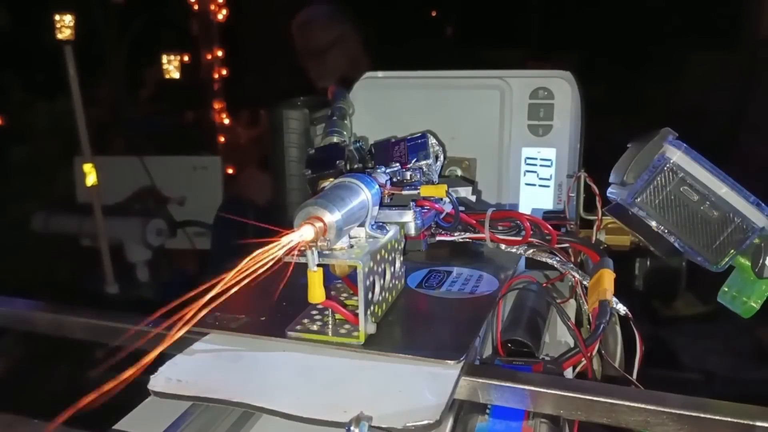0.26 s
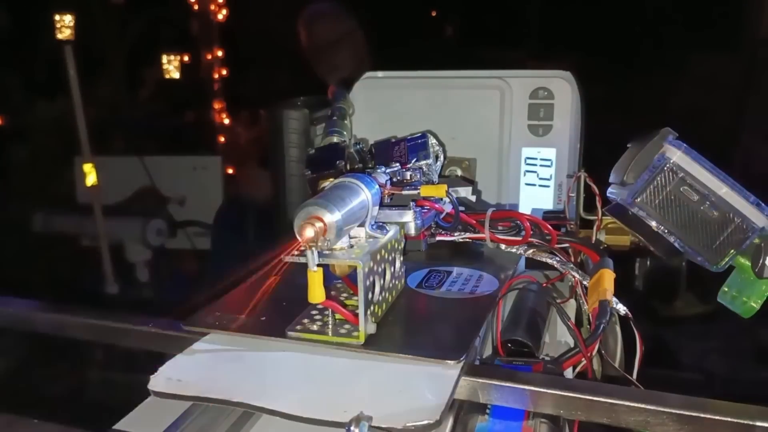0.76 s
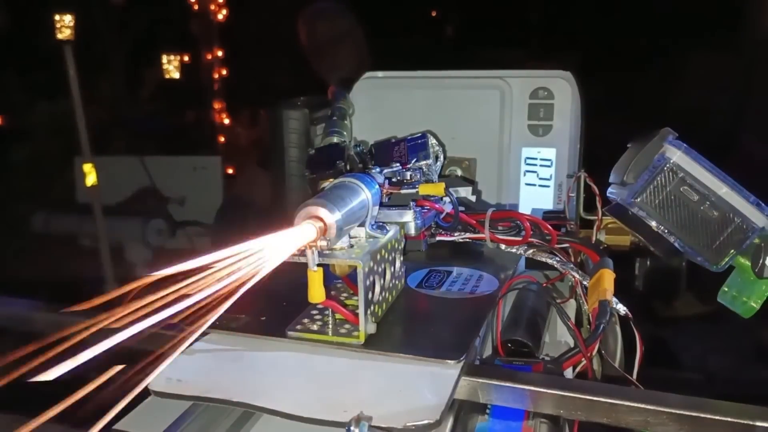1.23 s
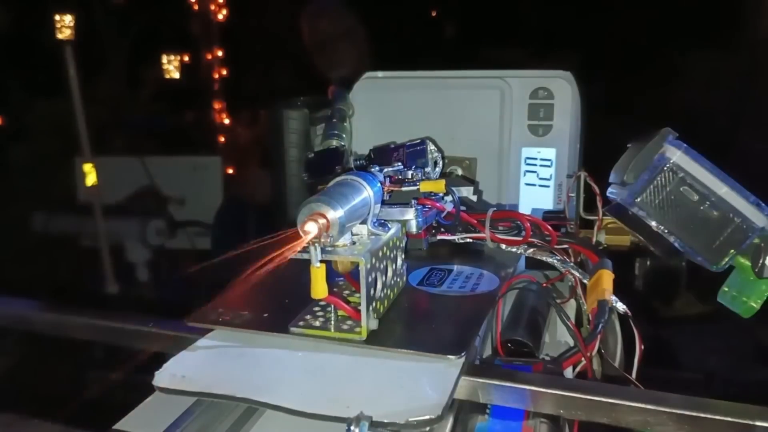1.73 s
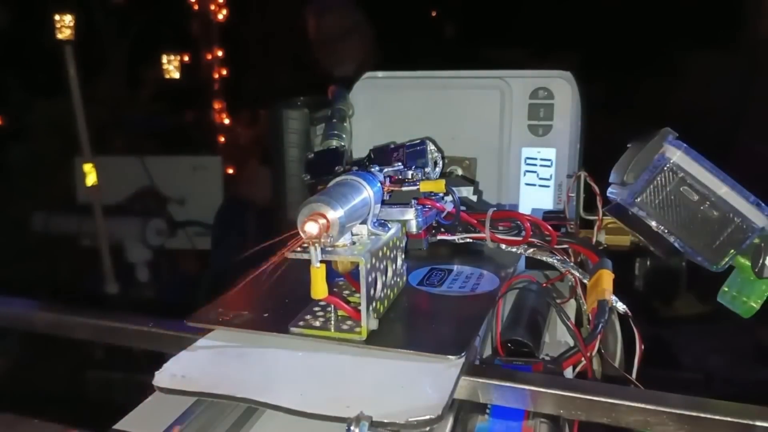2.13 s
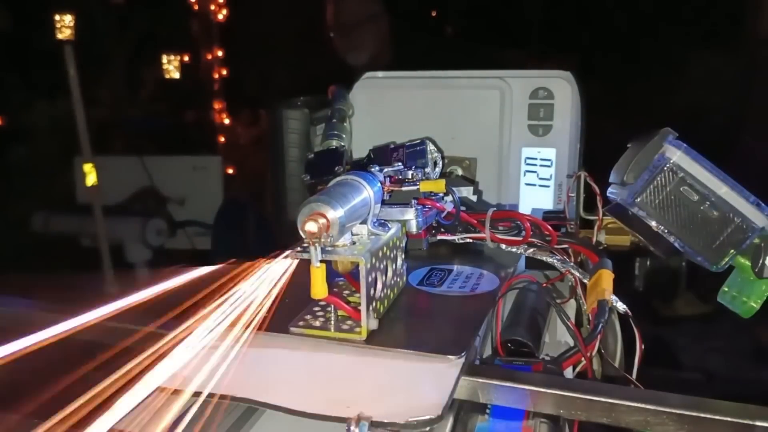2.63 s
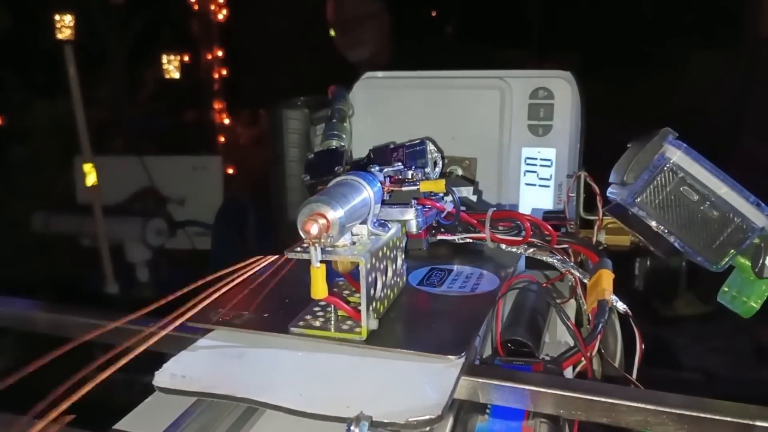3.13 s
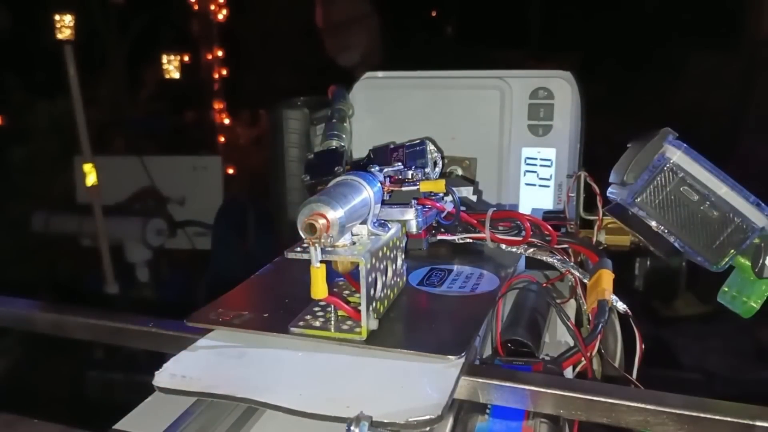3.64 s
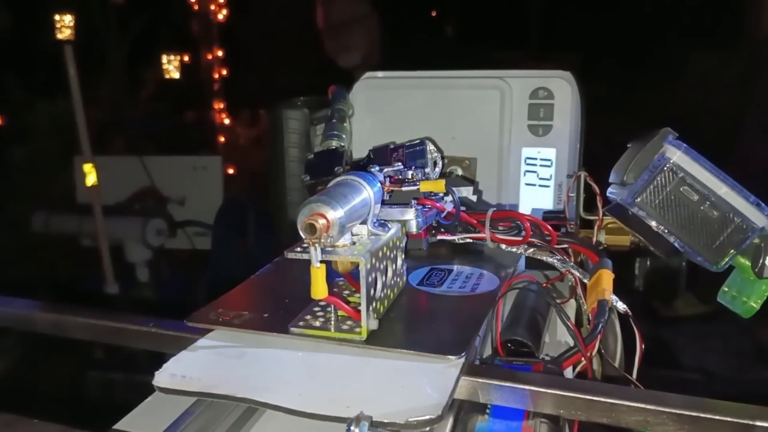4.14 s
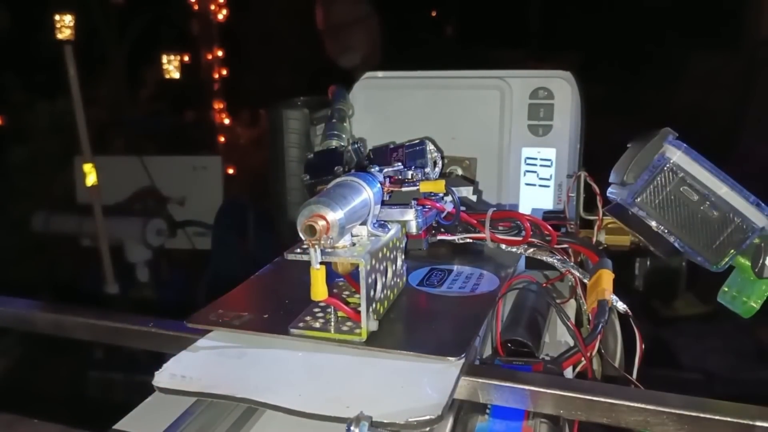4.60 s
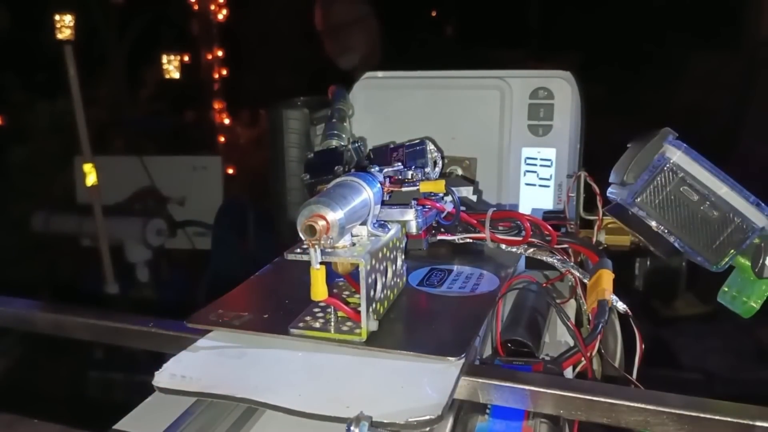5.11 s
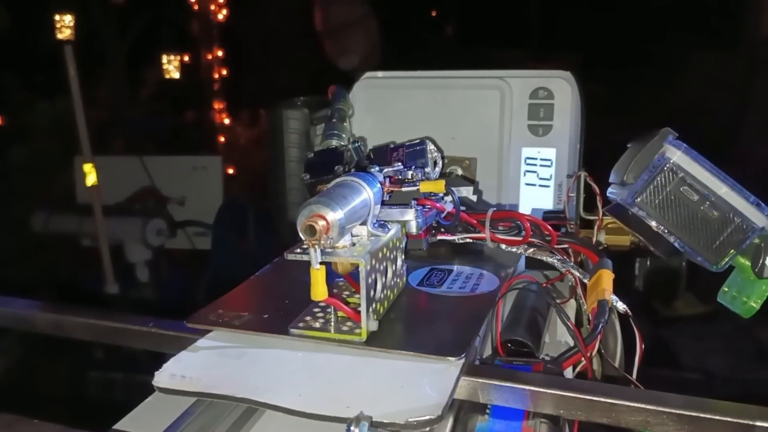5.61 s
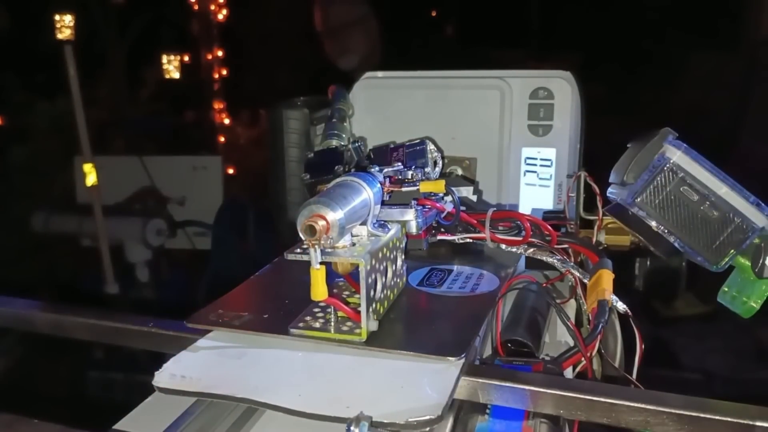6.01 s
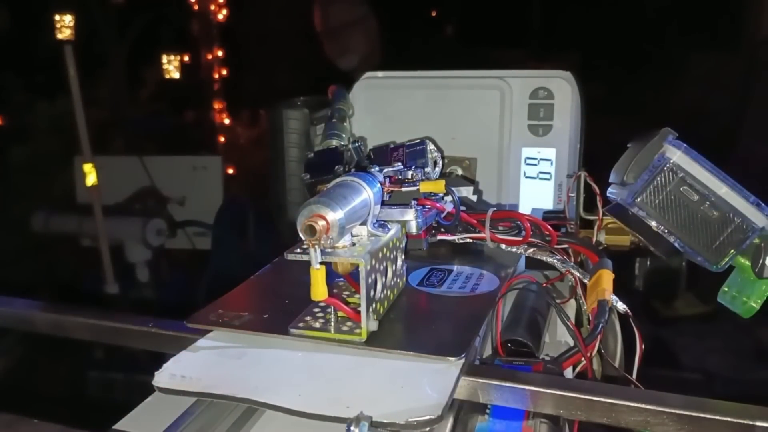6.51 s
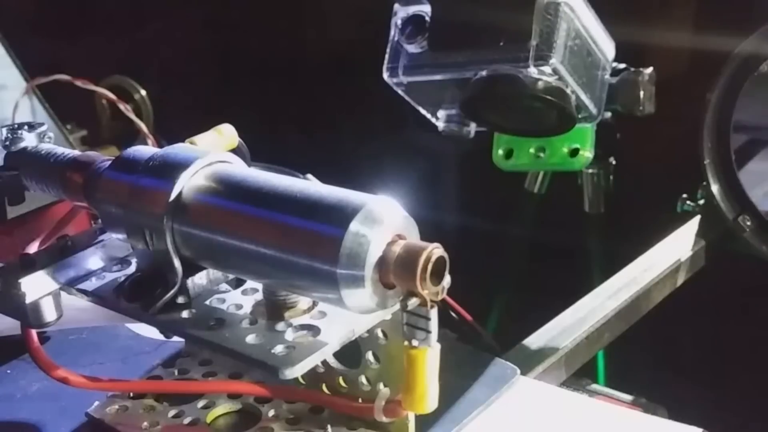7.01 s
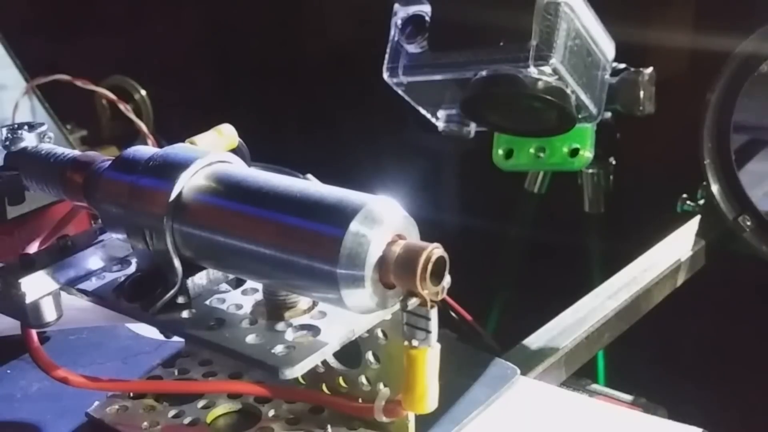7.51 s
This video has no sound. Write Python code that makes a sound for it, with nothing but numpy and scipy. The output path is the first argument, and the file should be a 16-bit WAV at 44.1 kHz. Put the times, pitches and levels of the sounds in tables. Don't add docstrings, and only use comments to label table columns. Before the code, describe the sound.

Stereo microphone near an arc-heated air jet outdoors: thin whistling sputter first, then sudden violent rushing air with low wind thumps, strongest early and rough around the edges. The blast steadies and stops abruptly. A soft throbbing bleed of air dies down above a piston compressor's low chug. An abrupt cut brings harsh, ringing, nearly overloaded nozzle hiss right up close, in mono.

```python
import sys
import numpy as np
from scipy import signal
from scipy.fft import rfft, irfft
from scipy.io import wavfile
from scipy.ndimage import uniform_filter1d, map_coordinates

SR = 44100
rng = np.random.default_rng(int(sys.argv[2]) if len(sys.argv) > 2 else 0)


def persist_wave(psi):
    counts = np.round(np.clip(psi, -1, 1) * 32767).astype(np.int16)
    wavfile.write(sys.argv[1], SR, np.atleast_2d(counts).T)


def gain_from_decibels(decibels):
    exponent = np.asarray(decibels, float) / 20
    return 10 ** exponent


N = 341775
T = np.arange(N) / SR
HZ = np.maximum(np.arange(N // 2 + 1) * SR / N, 1)
SIMMER_ENDS_S, WIDE_ENDS_S = 0.79, 6.4712


def shape(table):
    return np.interp(np.log(HZ), np.log(np.array(table)[:, 0]), np.array(table)[:, 1])


def joined(low, high, hz):
    low_db, high_db, at = shape(low), shape(high), int(hz * N / SR)
    return gain_from_decibels(np.where(HZ < hz, low_db, high_db + low_db[at] - high_db[at]))


def ring(hz, width_hz):
    return 1 / (1 + 1j * (HZ / hz - hz / HZ) * hz / width_hz)


def walk(rate_hz):
    hold = int(SR / rate_hz)
    steps = np.repeat(rng.standard_normal(N // hold + 1), hold)
    return 1.305 * uniform_filter1d(uniform_filter1d(steps, hold), hold)[:N]


def swells(table):
    return sum(db * np.exp(-((T - s) / half_s) ** 2) for s, half_s, db in table)


def valve(start_s, full_s, cut_s, db_per_s):
    opening = np.clip((T - start_s) / (full_s - start_s), 0, 1) ** 1.2
    return opening * gain_from_decibels(-db_per_s * np.maximum(T - cut_s, 0))


def sag(start_s, db, tau_s):
    return db * np.exp(-np.maximum(T - start_s, 0) / tau_s)


def band_rms(spectrum, lo_hz, hi_hz):
    mid = spectrum.mean(axis=0)[(HZ > lo_hz) & (HZ < hi_hz)]
    return np.sqrt(2 * np.sum(abs(mid) ** 2)) / N


def port_noise(shadow, bass_alike_hz=1):
    # frequency in Hz, left minus right in dB.
    housing = [(40, 4.87), (150, 1), (1000, 0.3), (3800, 2.8), (4700, 1.9), (5300, 10), (6100, 13.97),
               (6350, 5), (7200, 0.1), (8500, -2), (10500, 0.03), (12300, 3.97), (14000, 0), (16000, 0.2)]
    # frequency in Hz, likeness of the ports (0-1).
    likeness = [(40, 0), (2000, 0.067), (3500, 0.0023), (5200, 0.28), (6300, 0.3), (8000, 0.041),
                (16000, 0.002)]
    lag_samples = 8
    shared, left, right = rfft(rng.standard_normal((3, N)))
    alike = np.clip(shape(likeness) + 1 / (1 + (HZ / bass_alike_hz) ** 2), 0, 1)
    late = np.exp(-2j * np.pi * HZ * lag_samples / SR)
    pair = np.sqrt(alike) * shared * np.array([late ** 0, late])
    pair = pair + np.sqrt(1 - alike) * np.array([left, right])
    tilt = gain_from_decibels(shadow * shape(housing))
    return pair * np.array([tilt, tilt ** 0]) / np.sqrt(1 + tilt ** 2)


def patchy(x):
    patch_db, patch_octaves, patch_s = 1.8, .3, .03
    hz, s, z = signal.stft(x, SR, nperseg=1024)
    rows = np.log2(np.maximum(hz, 40) / 40) / patch_octaves
    columns = s / patch_s
    field = rng.standard_normal((int(rows[-1]) + 2, int(columns[-1]) + 2))
    db = patch_db * map_coordinates(field, np.meshgrid(rows, columns, indexing="ij"), order=1)
    return signal.istft(z * gain_from_decibels(db * (hz[:, None] < 5000)), SR)[1][:, :N]


def camera_gain():
    ducked_db, settled_db, overshoot_db, settle_s = -10.5, -4, 8, 0.91
    recovers_s = (4.25, 4.6)
    free_db = settled_db + sag(recovers_s[1], overshoot_db, settle_s)
    return gain_from_decibels(ducked_db + (free_db - ducked_db) * np.interp(T, recovers_s, [0, 1]))


def yard():
    # frequency in Hz, level in dB per Hz.
    yard_air = [(24, -20), (60, -2), (110, 0), (200, -4), (340, -3), (480, 4), (620, 2), (800, -4),
                (1000, -3), (1500, -12), (2500, -30)]
    air = port_noise(.2, 430) * gain_from_decibels(shape(yard_air))
    return irfft(air, N) / band_rms(air, 20, 3000) * gain_from_decibels(-56 + walk(6))


def compressor(shaft_hz, orders, gain_db):
    phase = 2 * np.pi * np.cumsum(shaft_hz * (1 + .0005 * walk(1.5))) / SR
    order = np.transpose(orders)[0]
    start = np.where(order < 13, -1.35 * order ** 2, 2 * np.pi * rng.random(len(orders)))
    lines = sum(np.sqrt(2) * gain_from_decibels(db) * np.sin(k * phase + p) for (k, db), p in zip(orders, start))
    return lines * gain_from_decibels(gain_db + .5 * walk(6.6)), phase


def draught():
    air = port_noise(1.5) * ring(105, 160) ** 2
    return irfft(air, N) / band_rms(air, 20, 3000) * gain_from_decibels(-65 + 2 * walk(6.6)) * (T < SIMMER_ENDS_S)


def knocks():
    # time in seconds, left peak, right peak (full scale 1), pitch in Hz.
    puffs = [(.9655, .13, .03, 110), (.99, .08, 0, 100), (1.009, .3, -.15, 230), (1.106, .07, 0, 110),
             (1.116, .09, 0, 120), (1.144, .08, 0, 100), (1.172, .07, 0, 110), (1.272, .1, 0, 120),
             (1.4175, -.3, 0, 300), (1.4325, .35, 0, 220), (1.4455, .5, .1, 350), (4.4292, .13, 0, 130),
             (4.4432, .16, 0, 115), (4.461, .03, 0, 90)]
    # time in seconds, level in dB, T60 in seconds.
    ticks = [
        (5.733, -35, .04),
        (5.76, -46, .015),
        (5.767, -47, .015),
    ]
    out = np.zeros((2, N))
    for s, left, right, hz in puffs:
        turn = 4 * hz * (T - s)
        out -= turn * np.exp((1 - turn ** 2) / 2) * np.array([[left], [right]])
    out = irfft(rfft(out) / (1 + (65 / HZ) ** 4), N)
    crack = irfft(port_noise(.4, 9000) * ring(6100, 5500) ** 2, N)
    for s, level_db, t60_s in ticks:
        out += crack / crack.std() * (T > s) * gain_from_decibels(level_db - 60 * np.maximum(T - s, 0) / t60_s)
    return out


def bleed(shaft_phase):
    # frequency in Hz, level in dB per Hz.
    bleed_air = [(620, -10), (1050, -5.5), (1350, -11), (1460, -8), (1790, -5), (2630, -5.5), (2850, -6),
                 (3160, -3.5), (4650, -5.5), (6600, 1), (8500, -13.5), (11000, -46), (18700, -120)]
    bleed_top = [(4410, -30), (7500, 2), (8200, -5), (9840, -8), (10500, -9.5), (12400, -13), (13900, -12),
                 (14800, -9), (15700, 1)]
    # time in seconds, half length in seconds, swell in dB.
    hiccup = [
        (4.672, .012, -3),
    ]
    starts_s, settled_db, hiss_db = 4.46, -56, -51.5
    air = port_noise(0.87, 630) * joined(bleed_air, bleed_top, 8000)
    low = 1 / (1 + (HZ / 9500) ** 8)
    leak_db = settled_db + sag(starts_s, 12, 1.08) + sag(starts_s, -1, 0.084) + swells(hiccup)
    throb_db = 1.0 * np.cos(2 * shaft_phase + .3) + 0.67 * np.cos(shaft_phase + 1.2)
    leak = irfft(air * low, N) * gain_from_decibels(leak_db + throb_db + .5 * walk(14))
    hiss = irfft(air * (1 - low), N) * gain_from_decibels(hiss_db + throb_db / 2)
    return (leak + hiss) / band_rms(air, 1900, 6700) * (T > starts_s)


def simmer():
    # frequency in Hz, level in dB per Hz.
    simmer_air = [(180, -75), (300, -56), (623, -34), (709, -30.5), (878, -34), (1070, -28.5), (1490, -31),
                  (1800, -31.5), (2840, -26), (3100, -29.5), (3900, -19.5), (4630, -27), (4970, -15.5),
                  (6250, -1.5), (9200, -28.5), (12000, -53), (20200, -120)]
    simmer_top = [(4940, -30), (8400, -4), (9010, -8), (9670, -13.5), (10800, -16.5), (12000, -15.5),
                  (13200, -5), (14400, -13), (15100, 2), (15700, -2.5)]
    # time in seconds, half length in seconds, swell in dB.
    spits = [
        (.1, .012, 3.5),
        (.16, .02, 0.5),
        (.27, 0.0089, 2.5),
        (.41, 0.026, 1.5),
        (.65, .025, 3.5),
        (.71, 0.025, 1.5),
    ]
    air = port_noise(1.9, 500) * joined(simmer_air, simmer_top, 8000)
    low = 1 / (1 + (HZ / 8800) ** 12)
    whistle = irfft(air * low, N) / band_rms(air, 4400, 6300)
    whistle = whistle * gain_from_decibels(-31.5 + swells(spits) + .7 * walk(90))
    top = irfft(air * (1 - low), N) / band_rms(air, 8850, 14850)
    top = top * gain_from_decibels(-44.5 + 1.9 * walk(40) + 0.82 * walk(10))
    return (whistle + top) * gain_from_decibels(-300 * np.maximum(T - SIMMER_ENDS_S, 0))


def close_jet():
    # frequency in Hz, level in dB per Hz.
    near_air = [(24, -62), (40, -33), (189, -23), (331, -26), (664, -15.5), (889, -19.5), (1060, -15),
                (1630, -23), (2990, -17.5), (3500, -17), (3830, -11), (4690, -11), (6280, 0), (7690, -3.5),
                (8600, -23), (11200, -53), (18900, -120)]
    near_top = [(4710, -31), (8000, -4.5), (8390, -14.5), (10000, -20), (10400, -13.5), (10800, -10),
                (11200, -6.5), (11700, -1.5), (12200, -1), (13400, -14), (14600, -15), (14900, -20),
                (15700, -21)]
    # frequency in Hz, width in Hz, level in dB per Hz.
    nozzle = [(966, 54, -21), (1062, 73, -17.5), (3835, 150, -10), (5210, 320, -8), (5770, 260, -9),
              (6230, 370, -2.5), (7050, 310, -5.5), (7644, 280, -4.5), (11060, 200, -20), (11700, 200, -20),
              (14300, 250, -21)]
    # frequency in Hz, width in Hz, depth (0-1).
    bench_dips = [(6700, 120, 0.4), (8200, 340, .4), (10200, 300, .6), (14600, 400, .6)]
    hiss = rfft(rng.standard_normal(N)) * joined(near_air, near_top, 8300)
    out = irfft(hiss * gain_from_decibels(-6) / (1 + .8 * abs(ring(220, 200)) ** 2), N)
    for hz, width_hz, db in nozzle:
        tone = rfft(rng.standard_normal(N)) * ring(hz, width_hz) ** 2 * gain_from_decibels(db)
        out += irfft(tone, N) * gain_from_decibels(walk(25))
    dips = np.prod([1 - depth * ring(hz, width_hz) for hz, width_hz, depth in bench_dips], axis=0)
    out = irfft(rfft(out) * dips, N)
    return out / out.std() * gain_from_decibels(-8.5 + .5 * walk(9.5))


def throat_song():
    # start, full and cut in seconds, dying in dB per second, level in dB.
    throat = [
        (0.728, 0.83, 1.065, 300, -25),
        (4.426, 4.444, 4.47, 700, -37.5),
    ]
    song = port_noise(0.91) * ring(3845, 490) ** 2
    gain = sum(valve(*row) * gain_from_decibels(db) for *row, db in throat)
    return irfft(song, N) / band_rms(song, 3400, 3960) * gain


def blast():
    # frequency in Hz, level in dB per Hz.
    blast_air = [(18, -54), (30, -27), (49, -24), (102, 0), (149, 1.5), (262, 2), (622, 0.5), (721, 0),
                 (4600, -2.5), (5980, -34), (10100, -120)]
    blast_top = [(2350, -38), (4000, -3.5), (4690, -7.5), (5570, 0.5), (6660, 1), (7990, -9), (9760, -9.5),
                 (11100, -15.5), (13600, -15.5), (14900, -10), (15700, -0.5)]
    edges_hz = [1220, 4360, 6300]
    # time in seconds, arc heat in dB, plume washing over the camera in dB.
    jet = [
        (.86, 10, 0),
        (1.2, 10.5, 5),
        (1.42, 8, 8.5),
        (1.66, 6.5, 10.5),
        (1.8, 0, 9.5),
        (2.02, -1.5, 4.5),
        (2.26, -0.5, 1),
        (2.8, -2, .5),
        (4.4, -1.5, -0.5),
    ]
    # cold level in dB, share of heat, share of wash, flicker in dB.
    regions = [
        (-35, 0.015, 1.2, 1.56),
        (-31.5, 0.16, 0.89, .4),
        (-21.5, 0.98, 0.0083, 1.8),
        (-28.5, 0.31, 0, 1.75),
    ]
    # start, full and cut in seconds, dying in dB per second.
    valve_rows = [
        (0.783, 0.89, 4.4, 240),
        (0.74, 0.865, 4.395, 210),
        (.75, 0.876, 4.43, 211),
        (0.71, 0.93, 4.445, 457),
    ]
    unsteady_db = [.4, .2, .5, .6]
    # time in seconds, half length in seconds, swell in dB.
    flares = [
        (1.62, .06, 0.5),
        (2.36, 0.048, 5),
        (2.44, 0.056, 3.5),
        (4.4, .03, 1.5),
    ]
    # time in seconds, half length in seconds, swell in dB, share felt above the buffeting (0-1).
    gusts = [
        (.92, 0.046, -1, 0),
        (1.01, 0.018, 5, 1),
        (1.07, 0.018, -5, .7),
        (1.35, 0.033, 1, 0.2),
        (1.434, 0.028, 2.5, 0),
        (2.44, 0.067, 2.5, 0),
        (2.8, 0.09, 0.5, 0),
        (3.65, 0.058, 1.5, 0),
    ]
    air = port_noise(0.98) * joined(blast_air, blast_top, 4120)
    lows = [0] + [1 / (1 + (HZ / hz) ** 8) for hz in edges_hz] + [1]
    spans_hz = [(60, 700), (1000, 3200), (4800, 7500), (14600, 15700)]
    jet_s, heat, wash = np.transpose(jet)
    heat_db = np.interp(T, jet_s, heat) + swells(flares)
    wash_db = np.interp(T, jet_s, wash)
    bass_gust_db = swells([(s, half_s, db) for s, half_s, db, _ in gusts])
    upper_gust_db = swells([(s, half_s, db * share) for s, half_s, db, share in gusts])
    burning = np.clip(heat_db / 3.4, .3, 1.5)
    out = 0
    for k, (cold_db, hot, washed, flicker_db) in enumerate(regions):
        own = np.array([walk(35), walk(35)])
        gust_db = upper_gust_db if k else bass_gust_db
        level_db = cold_db + hot * heat_db + washed * (wash_db + gust_db)
        level_db = level_db + unsteady_db[k] * burning * walk(29.65)
        region = irfft(air * (lows[k + 1] - lows[k]), N) / band_rms(air, *spans_hz[k])
        out = out + region * valve(*valve_rows[k]) * gain_from_decibels(level_db + flicker_db * own)
    return patchy(out) + throat_song()


def scene():
    # multiple of the shaft rate, level in dB rms.
    far_orders = [(2, -76.5), (3, -63.1), (5, -61.8), (6, -63.9), (7, -59.5), (8, -63.4), (9, -65.0),
                  (10, -70.5), (11, -67.9), (12, -65.3), (14, -72.8), (20, -68.4), (24, -68.9), (25, -70.7),
                  (28, -70.1), (30, -68.9), (31, -72.1), (32, -69.0), (33, -73.2), (34, -64.4), (35, -72.4),
                  (39, -75.4), (41, -72.1), (42, -79.6), (44, -75.4), (46, -77.9), (47, -76.6), (48, -77.4),
                  (49, -79.6), (50, -79.9)]
    near_orders = [(3, -55.4), (4, -61.2), (5, -56.7), (6, -48.1), (7, -44.2), (8, -52.2), (9, -47.8),
                   (10, -51.5), (11, -57.6), (12, -57.4), (13, -57.5), (14, -57.1), (15, -58.1),
                   (16, -53.8), (30, -54.1), (41, -48.8), (44, -50.8), (46, -48.9)]
    close_starts_s, fade_in_s = 6.4862, .0015
    pump, phase = compressor(27.85, far_orders, .6)
    wide = (pump + yard()) * camera_gain() + draught() + knocks() + bleed(phase) + simmer() + blast()
    close = compressor(28.13, near_orders, 1.2)[0] + close_jet()
    return wide * (T < WIDE_ENDS_S) + close * np.clip((T - close_starts_s) / fade_in_s + .5, 0, 1)


def starve(x):
    # frequency in Hz, share of time the sum is lost, share the difference is lost (0-1).
    starved = [(6200, 0, 0), (6900, 0, .5), (7300, 0, .8), (8600, 0, .6), (9900, .04, .45), (10700, .3, .3),
               (12000, .12, .3), (13200, .25, .3), (14200, .08, .55), (14800, 0, .6), (16000, 0, .7)]
    hz, s, z = signal.stft([x[0] + x[1], x[0] - x[1]], SR, nperseg=2048)
    in_close = s > WIDE_ENDS_S - .03
    quiet = s > 4.57
    local = np.sqrt(uniform_filter1d(abs(z) ** 2, size=32, axis=1) + 1e-14)
    peak = local.max(axis=(0, 1))
    loudness = peak / local[..., s < WIDE_ENDS_S - .03].max()
    under_db = 20 * np.log10(peak / local)
    dead_zone = np.clip((under_db - 8) / 22, .35, 1.45) * local

    luck = uniform_filter1d(rng.standard_normal((len(hz) // 24 + 1, len(s))), size=3, axis=1)
    luck = uniform_filter1d(luck, size=2, axis=0)
    rank = luck.ravel().argsort().argsort().reshape(luck.shape) / luck.size
    rank = np.repeat(rank, 24, axis=0)[:len(hz)]
    at_hz, *shares = np.transpose(starved)
    lost_sum, lost_difference = (np.interp(hz, at_hz, share)[:, None] for share in shares)
    lost_difference = lost_difference + quiet * (lost_difference > 0) * .4
    lost_sum = lost_sum * np.where(quiet, .3 * (hz[:, None] > 11000), .5 + 2.5 * loudness)

    thin = .13 * np.outer((hz > 1700) & (hz < 3400), s < .8)
    thin = thin + .27 * np.outer((hz > 10800) & (hz < 14200), quiet)
    narrow = rng.random((len(hz) // 8 + 1, len(s) // 2 + 1))
    narrow = np.repeat(np.repeat(narrow, 8, axis=0), 2, axis=1)[:len(hz), :len(s)]

    keep = np.array([rank >= lost_sum, 1 - rank > lost_difference]) & (abs(z) > dead_zone)
    keep &= narrow > thin
    keep |= hz[:, None] < 1200
    keep[0] |= in_close
    mid, side = signal.istft(z * keep, SR)[1][:, :N] / 2
    return np.array([mid + side, mid - side])


def low_pass(x):
    return signal.sosfilt(signal.butter(12, 17130, fs=SR, output="sos"), x)


def record(dry):
    bent = starve(np.tanh(dry))
    top_cut = np.sin(np.pi / 2 * np.clip((15780 - HZ) / 120, 0, 1)) ** 2
    mix = np.clip(irfft(rfft(bent) * top_cut, N), -1, 1)
    return low_pass(mix)


dry = scene()
out = record(dry)
persist_wave(out)
```